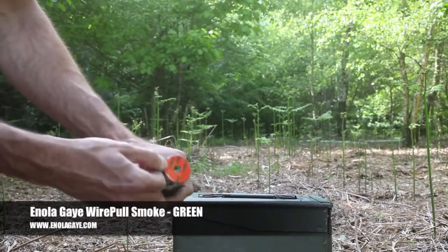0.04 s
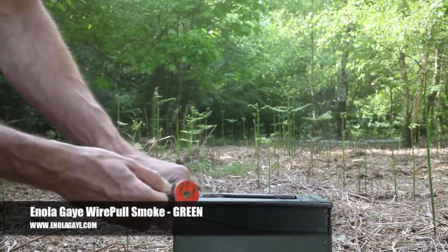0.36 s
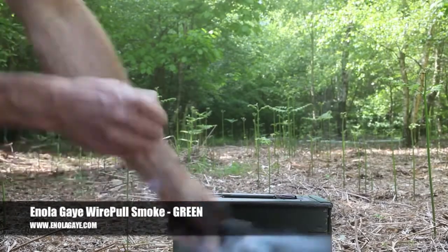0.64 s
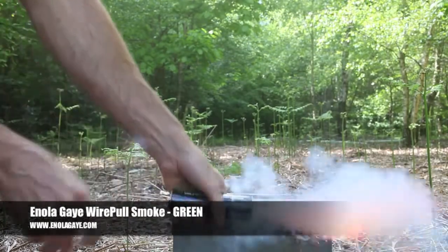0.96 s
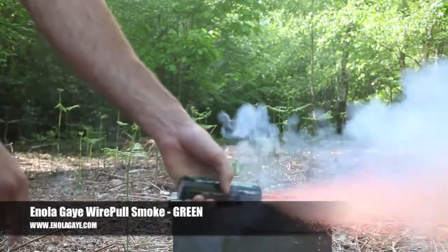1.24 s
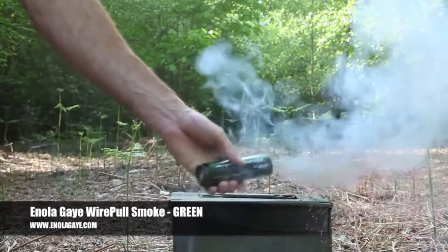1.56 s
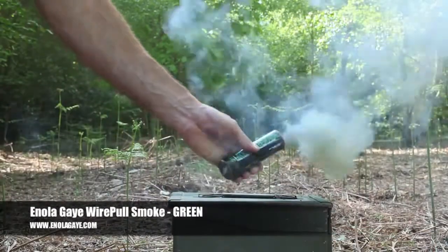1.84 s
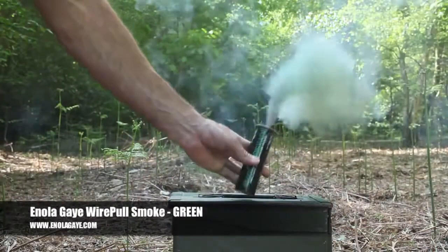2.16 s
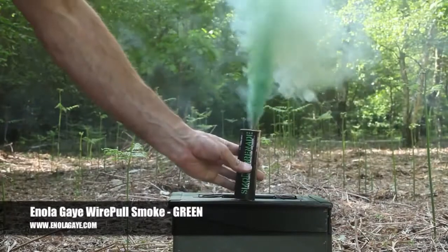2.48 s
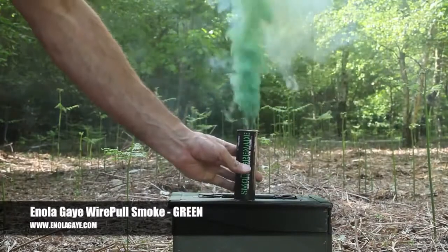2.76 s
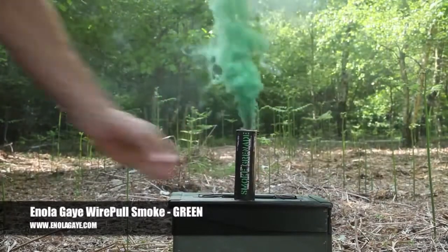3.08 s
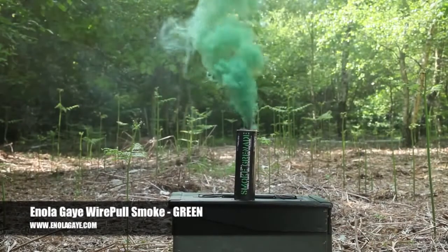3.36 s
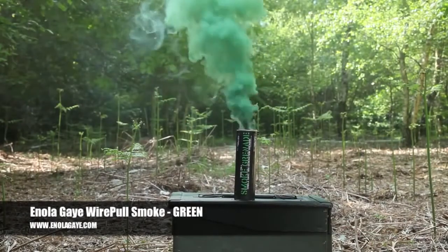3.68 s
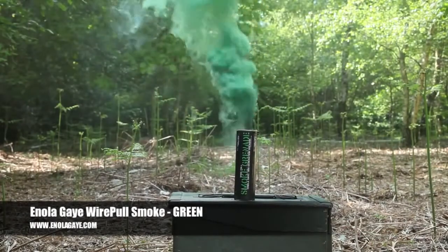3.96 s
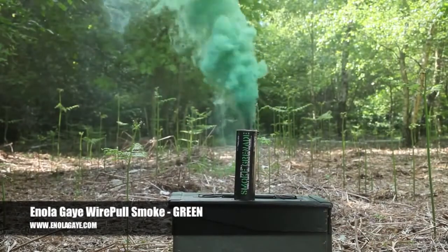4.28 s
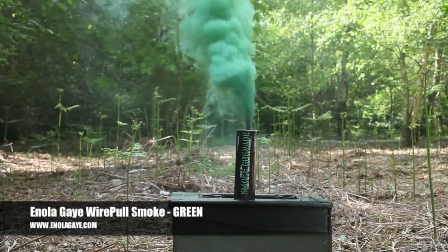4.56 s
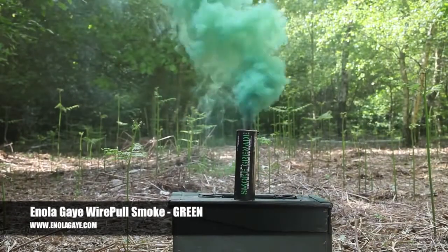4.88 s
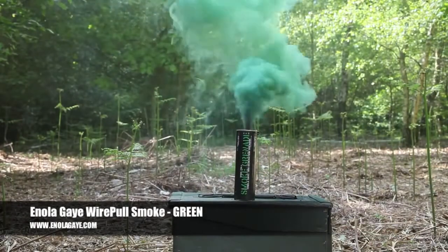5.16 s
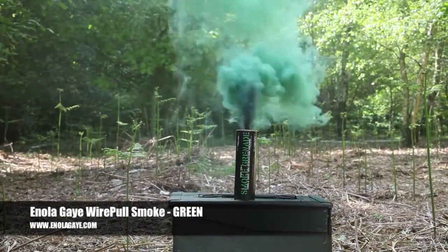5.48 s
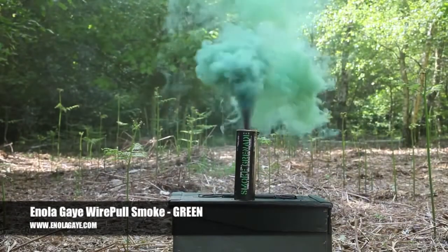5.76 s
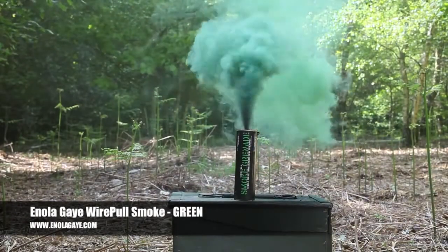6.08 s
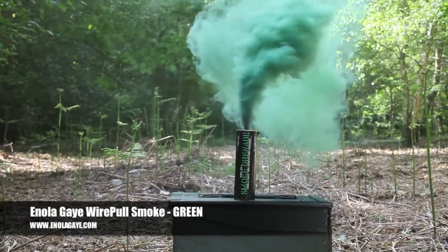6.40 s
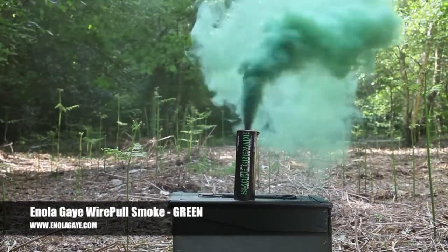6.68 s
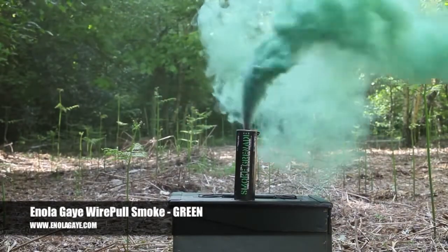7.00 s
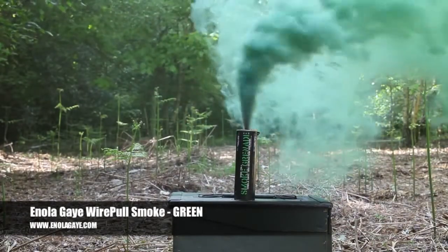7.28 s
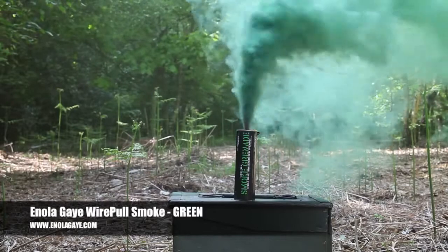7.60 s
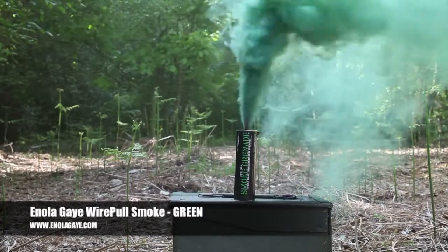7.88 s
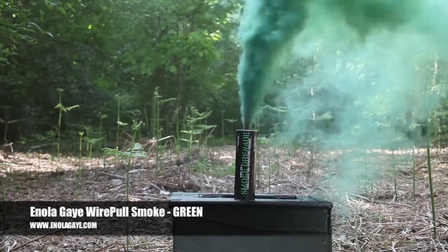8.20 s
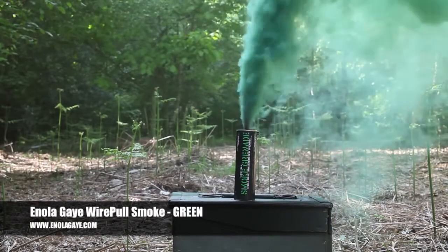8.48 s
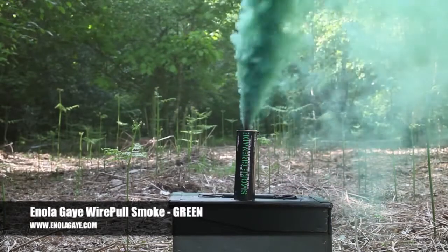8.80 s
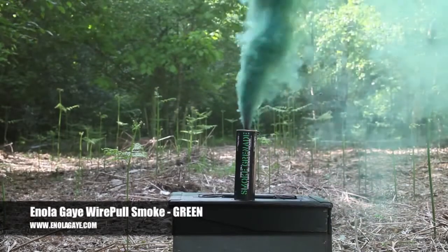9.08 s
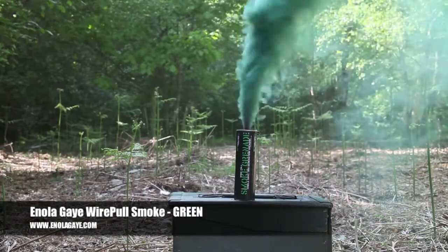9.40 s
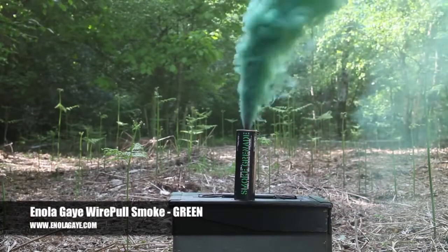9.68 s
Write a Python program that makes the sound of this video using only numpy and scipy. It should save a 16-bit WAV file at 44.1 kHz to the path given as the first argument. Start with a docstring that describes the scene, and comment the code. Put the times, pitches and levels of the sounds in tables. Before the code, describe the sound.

Close by in a wooded clearing, small handling ticks and a quick gritty pull lead to one sharp pop. A smoke canister flares with a swelling rush, then hisses with a shifting, hollow tone. The hiss dips, and sputtering crackles and snaps break through as it grows. They die away, leaving a stronger, even jet that sinks slightly in pitch. A soft wind rumble and faint leaves lie underneath.

```python
"""A smoke canister's jet roars through its resonant vent, on a metal box in a forest clearing.
First the pull ring ticks, the wire rasps through the igniter, the cap pops and a priming flame rushes out.
Then turbulent gas takes over, its main resonance sinking as the burn hollows the canister. Slag fries,
spurts and spits for a few seconds, and close echoes sweep through the jet as it is swung upright.
Underneath lie a gusty low rumble and the faint wash of the trees."""
import sys
import numpy as np
from scipy import signal
from scipy.fft import rfft, irfft, next_fast_len
from scipy.io import wavfile
from scipy.ndimage import map_coordinates

SR = 44100
rng = np.random.default_rng(int(sys.argv[2]) if len(sys.argv) > 2 else 0)


def dump_mix(stems):
    """Bounce the given channels to the path in sys.argv[1] as a 16-bit WAV at rate SR."""
    frames = np.atleast_2d(stems).T  # one column per channel
    limited = np.clip(frames, -1, 1)  # hard clip at full scale
    pcm = np.round(limited * 32767).astype(np.int16)
    wavfile.write(sys.argv[1], SR, pcm)


N = 434385
SIZE, HOP = 512, 128  # filter frame and step, in samples
TIME = np.arange(N) / SR
FRAME_S = np.arange(N // HOP + 5) * HOP / SR
HZ = np.fft.rfftfreq(SIZE, 1 / SR)

# the vent points sideways over the lid, then up and away from the close surfaces: time_s, echo_weight
VENT_AIM = [(1.4, .9), (2.05, 1.05), (2.35, 1), (2.5, .35)]
# the main charge catches: time_s, gain
CHARGE_ONSET = [(1.33, 0.051), (1.44, 1)]
# tone of a bursting speck: frequency_hz, level_db
SNAP_COLOUR = [(300, -27), (1200, -17), (2500, -3), (4000, 4.5), (6500, 0), (9000, -6), (15500, -7.5)]


def amp(db):
    """Decibels to gain."""
    return 10 ** (np.asarray(db) / 20)


def unit_rms(x):
    """Scaled to rms 1."""
    return x / np.sqrt(np.mean(x ** 2) + 1e-20)


def power_sum(*levels_db):
    """The level of unrelated sounds heard at once, in dB."""
    return 10 * np.log10(sum(amp(db) ** 2 for db in levels_db) + 1e-14)


def ramp(t, start_s, length_s):
    """A straight fade from 0 to 1."""
    return np.clip((t - start_s) / length_s, 0, 1)


def follow(rows, t):
    """The columns of an automation curve at the times t."""
    times, *columns = np.transpose(rows)
    return [np.interp(t, times, column) for column in columns]


def add(mix, start_s, sound):
    """Mixes a sound in at start_s."""
    part = mix[round(start_s * SR):][:len(sound)]
    part += sound[:len(part)]


def eq_gain(colour, hz):
    """The gain of an EQ curve whose dB points are joined on a log-frequency axis."""
    points_hz, level_db = np.transpose(colour)
    return amp(np.interp(np.log(hz + 1), np.log(points_hz + 1), level_db))


def wander(rate_hz, t):
    """Smooth random modulation, rms 1."""
    hz = np.fft.rfftfreq(len(t), t[1] - t[0])
    spectrum = rfft(rng.standard_normal(len(t))) / (1 + (hz / rate_hz) ** 2)
    return unit_rms(irfft(spectrum, len(t)))


def noise(colour):
    """Steady coloured noise, rms 1."""
    size = next_fast_len(N)
    spectrum = rfft(rng.standard_normal(size)) * eq_gain(colour, np.fft.rfftfreq(size, 1 / SR))
    return unit_rms(irfft(spectrum, size)[:N])


def click(colour):
    """The tightest click of a given colour (minimum phase), peak 1."""
    log_gain = np.log(eq_gain(colour, abs(np.fft.fftfreq(SIZE, 1 / SR))))
    pulse = np.fft.ifft(np.exp(np.conj(signal.hilbert(log_gain)))).real
    return pulse / abs(pulse).max()


def grains(per_s, spread_db):
    """Tiny impulses at random moments, a few of them large; rms 1."""
    size = amp(spread_db * np.minimum(rng.exponential(1, N), 4)) * rng.choice([-1, 1], N)
    return unit_rms(size * (rng.random(N) < per_s / SR))


def band_rms(gain, lo_hz, hi_hz):
    """Per frame, the rms that a filter passes in one band from white noise of rms 1."""
    inside = (HZ >= lo_hz) & (HZ <= hi_hz)
    return np.sqrt(np.mean(gain ** 2 * inside, axis=1, keepdims=True)) + 1e-12


def shelf(corner_hz, order):
    """A smooth step from 0 below the corner to 1 above it."""
    return 1 - 1 / (1 + (HZ / corner_hz) ** order)


def moving_filter(x, gain):
    """Passes x through an EQ that changes from frame to frame."""
    frames = signal.stft(x, nperseg=SIZE, noverlap=SIZE - HOP)[2]
    return signal.istft(frames * gain[:frames.shape[1]].T, nperseg=SIZE, noverlap=SIZE - HOP)[1][:N]


def outdoors():
    """A gusty rumble under the faint wash of the trees; both duck briefly after the pop."""
    # the rumble, whose sub-bass builds with the plume: time_s, bass_db, sub_db
    rumble_levels = [(0, -38, -55), (.5, -34, -54), (1.4, -39, -59), (2.4, -40, -58), (2.9, -32.5, -55),
                     (3.6, -36, -49), (6, -36, -43), (9.85, -37, -43)]
    # tone of the rumble: frequency_hz, level_db
    rumble_colour = [(18, -45), (25, -33), (32, -17), (45, -8.5), (62, 1), (80, -1.5), (105, -2.5),
                     (140, -3), (190, -10.5), (280, -19.5), (450, -22.5), (1000, -70)]
    # tone of the trees: frequency_hz, level_db
    trees_colour = [(150, -20), (300, 0), (460, -3.5), (800, 2), (1300, -1.5), (1900, -8), (2600, -12),
                    (3600, -2), (5000, -10.5), (8000, -13.5), (15500, -15.5)]
    bass_db, sub_db = follow(rumble_levels, TIME)
    low = noise(rumble_colour)
    sub = signal.sosfiltfilt(signal.butter(4, 55, fs=SR, output="sos"), low)
    gusts_db = 3.5 * wander(3, TIME)
    rumble = amp(bass_db) * unit_rms(low - sub) + amp(sub_db + gusts_db) * unit_rms(sub)
    trees = amp(-45.5) * noise(trees_colour)
    duck_db = -13.5 * (ramp(TIME, start_s=.59, length_s=.03) - ramp(TIME, start_s=.75, length_s=.3))
    return amp(duck_db) * (rumble + trees)


def clearing_reverb(x, t60_s):
    """A thin scatter from trunks and leaves."""
    t = TIME[:SR // 2]
    taps = rng.standard_normal(len(t)) * (rng.random(len(t)) < .05)
    taps = taps * amp(-60 * t / t60_s) * (t > .012)
    return signal.oaconvolve(x, taps / np.linalg.norm(taps))[:N]


def close_echoes(x, near, middle, far, blur_hz):
    """Three close surfaces comb the sound; the length of the plume blurs the upper notches. Rms 1."""
    # echo delays, shortening as the canister is swung upright: time_s, near_ms, middle_ms, far_ms
    delays = [(.65, 0.92, 1.06, 1.9), (.95, 0.88, 1.11, 1.87), (1.4, 0.95, 1.2, 1.78),
              (1.62, .45, 1.13, 1.5), (1.85, 0.33, 1.06, 1.36), (2.35, 0.42, 0.71, 1.3),
              (3.5, 0.38, .66, 1.4), (6, 0.38, 0.78, 1.41), (9.85, 0.35, 0.96, 1.4)]
    soft = signal.sosfiltfilt(signal.butter(1, blur_hz, fs=SR, output="sos"), x)
    for gain, delay_ms in zip((near, middle, far), follow(delays, TIME)):
        x = x + gain * map_coordinates(soft, [np.arange(N) - delay_ms * SR / 1000], order=3)
    return unit_rms(x)


def handling():
    """Fingers and pull ring scuff and tick on the canister."""
    # each touch: start_s, relative_db, t60_s
    touches = [(.104, -41, .008), (0.273, -21, 0.037), (.329, -34, 0.07), (.359, -37, .04),
               (0.4744, -15.5, 0.018)]
    # tone of a scuff: frequency_hz, level_db
    scuff_colour = [(200, -22), (800, -1), (1800, 0.5), (3500, -2), (7000, -9), (13000, -4), (16000, -12)]
    out, t = np.zeros(N), TIME[:SR // 8]
    scuff = noise(scuff_colour)
    for start_s, level_db, t60_s in touches:
        envelope = amp(level_db - 4.5 - 60 * t / t60_s)
        add(out, start_s, envelope * scuff[round(start_s * SR):][:len(t)])
    return out


def pull_wire():
    """The wire drags through the friction compound with a gritty rasp."""
    # the pull: time_s, relative_db
    pull = [(.5, -65), (.545, -36), (.559, -36), (.565, -24), (.583, -28), (.592, -17), (.604, -19.5),
            (.609, -33), (.625, -60)]
    # tone of the rasp: frequency_hz, level_db
    rasp_colour = [(300, -19), (1000, -10), (2800, -1.5), (4200, -6), (5500, -11), (10000, -11),
                   (15500, -9)]
    level_db, = follow(pull, TIME)
    friction = noise(rasp_colour)
    grit = unit_rms(signal.oaconvolve(grains(1200, spread_db=3), click(rasp_colour))[:N])
    pulling = (TIME > pull[0][0]) & (TIME < pull[-1][0])
    return amp(level_db - 4.5) * (friction + .7 * grit) * pulling


def cap_pop():
    """The igniter cap cracks three times in one pop, puffing gas and ringing the tube."""
    # each crack: start_s, gain_db
    cracks = [(.5843, 0.5), (0.5856, 1), (0.5866, 3)]
    # modes of the tube: pitch_hz, level_db, t60_s
    tube_modes = [(756, -24, 0.011), (1130, -11.5, 0.012), (1730, -5, 0.0076), (2620, -2, 0.0074),
                  (3130, -6, 0.01), (3400, -7, 0.014), (6500, -16, 0.0076)]
    out, t = np.zeros(N), TIME[:SR // 20]
    ring = sum(amp(db - 60 * t / t60_s) * np.sin(2 * np.pi * hz * t) for hz, db, t60_s in tube_modes)
    for start_s, gain_db in cracks:
        gas = amp(-20 - 60 * t / .013) * rng.standard_normal(len(t))
        add(out, start_s, amp(gain_db) * (ring + gas))
    return out


def priming_flame():
    """The priming charge flares sideways just over the lid: a broad, hollow rush."""
    # the flame swells and dies: time_s, level_db
    swell = [(.61, -39), (.68, -32), (.77, -31.5), (.92, -24), (1.0, -24.5), (1.05, -22), (1.19, -18),
             (1.26, -21), (1.4, -27.5)]
    # tone of the flame: frequency_hz, level_db
    flame_colour = [(100, -30), (230, 2), (330, 5), (480, -13), (620, -3), (800, -2.5), (1200, -1.5),
                    (1420, -1), (1650, 2.5), (1920, -3.5), (2500, 3), (3300, 4), (4100, -7.5), (6000, -13),
                    (10000, -14.5), (15500, -26)]
    t = FRAME_S[:, None]
    level_db, = follow(swell, t)
    bass_db = -12.5
    treble_db = -17 - 25 * ramp(t, start_s=1.25, length_s=.5)  # the dying flame dulls
    gain = eq_gain(flame_colour, HZ)[None]
    gain = gain / band_rms(gain, 700, 4000)  # treble and bass are set against the mids
    gain = gain * (amp(treble_db) / band_rms(gain, 6000, 15000)) ** shelf(4500, order=6)
    gain = gain * (amp(bass_db) / band_rms(gain, 150, 400)) ** (1 - shelf(400, order=6))
    burning = np.interp(TIME, [.6, .615, 1.35, 1.45], [0, 1, 1, 0])
    rush = rng.standard_normal(N) + .5 * grains(2500, spread_db=2.5)
    rush = close_echoes(rush, near=.36, middle=.46, far=.26, blur_hz=8000)
    flicker_db = wander(50, TIME)
    return moving_filter(rush, gain * amp(level_db)) * burning * amp(flicker_db)


def specks():
    """Small specks burst at random: faint ticks between the loud spits."""
    # how thickly the burn sputters: time_s, specks_per_s
    density = [(3, 0), (3.2, 8), (3.8, 10), (4.1, 55), (6.2, 55), (6.5, 15), (6.9, 0)]
    per_s, = follow(density, TIME)
    size = amp(-25 + 4 * np.minimum(rng.exponential(1, N), 3))
    bursts = size * (rng.random(N) < per_s / SR)
    return signal.oaconvolve(bursts, click(SNAP_COLOUR))[:N]


def spits():
    """The loudest specks burst with a sharp snap and a brief spray, some dull, some bright."""
    # each spit: start_s, relative_db, tilt_db_per_octave
    hits = [(1.0388, -12, -10), (1.3373, -19, -1), (1.3499, -19, 2), (3.849, -18, -6.5), (4.009, -12, -2),
            (4.0561, -17, -6), (4.1025, -17, 1.2), (4.1386, -18, 0), (4.246, -19, 0), (4.368, -26, -3),
            (4.5502, -17.5, -2), (4.5702, -13.5, -9.5), (4.621, -22, -7), (4.8043, -18, -2),
            (4.8497, -13.5, -8), (4.924, -15, -4), (4.985, -18, -3.3), (5.1564, -19, -4), (5.3648, -20, -2),
            (5.4215, -12.5, -10), (5.4371, -15.5, -4), (5.6475, -17, -7), (6.1015, -19, -1),
            (6.1055, -15, 4), (6.1925, -16, -4), (6.2013, -19, -3), (6.2346, -21, -6)]
    tilt_above_hz = 900
    out, t = np.zeros(N), TIME[:SIZE]
    for start_s, level_db, tilt in hits:
        colour = [(hz, db + tilt * np.log2(max(hz / tilt_above_hz, 1))) for hz, db in SNAP_COLOUR]
        burst = .21 * rng.standard_normal(SIZE) * amp(-60 * t / .008)
        burst[0] = 1  # the snap, ahead of its spray
        add(out, start_s, amp(level_db + 7.5) * np.convolve(burst, click(colour)))
    return out


def slag_spurts(t):
    """Burning slag spurts in lopsided swells; gives their summed level and top-treble level in dB."""
    # each spurt: peak_s, rise_s, fall_s, level_db, top_offset_db
    spurts = [(.68, 0.03, 0.041, -31.5, 6), (.82, 0.097, 0.22, -43, 7), (1.037, .01, 0.02, -31.5, 1),
              (1.15, .07, .07, -29.5, -2.5), (1.342, 0.0075, .015, -36, 0), (3.48, .09, .1, -43, -11),
              (3.89, 0.034, 0.082, -31.5, -6), (3.995, 0.019, 0.052, -28.5, -4),
              (4.12, 0.093, 0.075, -36.5, -2), (4.28, 0.092, 0.22, -47, -7), (4.56, 0.051, .06, -35, -10),
              (4.86, 0.16, 0.085, -28.5, -9), (4.97, 0.068, 0.035, -22.5, -10),
              (5.09, 0.12, .11, -34.5, -2), (5.42, 0.1, 0.077, -39.5, -2.5), (5.525, 0.024, 0.048, -29, 0),
              (5.6, .03, 0.097, -40.5, 0), (5.8, 0.093, 0.13, -39, -3.5), (6.09, 0.14, 0.16, -36, -5),
              (6.66, .015, 0.023, -44, -1)]
    total = top = 1e-14
    for peak_s, rise_s, fall_s, level_db, top_offset_db in spurts:
        width_s = np.where(t < peak_s, rise_s, fall_s)
        power = amp(level_db) ** 2 * np.exp(-2 * ((t - peak_s) / width_s) ** 2)
        total = total + power
        top = top + power * amp(top_offset_db) ** 2
    return 10 * np.log10(total), 10 * np.log10(top)


def vent_resonance(sweep, width_hz, wobble):
    """The gain of a resonant peak whose pitch wavers with the flow."""
    pitch_hz, boost_db = follow(sweep, FRAME_S[:, None])
    pitch_hz = pitch_hz * (1 + wobble * wander(26, FRAME_S)[:, None])
    return np.sqrt(1 + (amp(boost_db) ** 2 - 1) / (1 + (2 * (HZ - pitch_hz) / width_hz) ** 2))


def sizzle():
    """Slag fries in the vent: a smooth hiss when weak, grainy and uneven when it spurts."""
    # steady frying: time_s, relative_db
    frying = [(1.4, -44), (1.8, -49.5), (2.05, -46.5), (2.36, -43.5), (2.46, -55), (3.2, -50.5), (7.2, -51),
              (8.3, -48), (9.85, -42)]
    # tone of the frying: frequency_hz, level_db
    frying_colour = [(200, 0.5), (500, -2.5), (1200, 4), (2500, 3.5), (4000, 8), (5200, 4.5), (6500, 1.5),
                     (8000, 1), (10500, 2), (13000, 1), (15800, -6)]
    # shrill resonance of the vent's rim, which sinks and swells over the burn: time_s, pitch_hz, boost_db
    rim_sweep = [(1.4, 7400, 2), (2.2, 7800, 9), (2.8, 7500, 15), (3.5, 6900, 11), (4.9, 6500, 3.5),
                 (5.4, 5700, 9), (7, 5800, 0), (9.85, 6000, 3)]
    t = FRAME_S[:, None]
    steady_db = follow(frying, t)[0] + 20 * np.log10(follow(CHARGE_ONSET, t)[0])
    spurt_db, spurt_top_db = slag_spurts(t)
    level_db = power_sum(steady_db, spurt_db)
    top_offset_db = power_sum(steady_db - 7, spurt_top_db) - level_db
    gain = eq_gain(frying_colour, HZ) * vent_resonance(rim_sweep, width_hz=1700, wobble=.01)
    gain = gain / band_rms(gain, 5000, 8500)
    gain = gain * (amp(top_offset_db) / band_rms(gain, 9000, 15000)) ** shelf(8500, order=8)
    grit_share = np.interp(np.interp(TIME, FRAME_S, spurt_db[:, 0]), [-52, -40], [.09, .33])
    grit_share *= np.interp(TIME, [1.4, 3.4], [.35, 1])  # smooth at first, until slag builds up
    hiss = np.sqrt(1 - grit_share) * rng.standard_normal(N)
    grit = np.sqrt(grit_share) * grains(1500, spread_db=3.6)
    send = follow(VENT_AIM, TIME)[0] ** 2
    fry = close_echoes(hiss + grit, near=.2 * send, middle=.27 * send, far=.5 * send, blur_hz=14000)
    flicker_db = 5 * grit_share * wander(50, TIME)
    return moving_filter(fry, gain * amp(level_db - 2.5)) * amp(flicker_db)


def smoke_jet():
    """Turbulent gas roars through three vent resonances, fluttering and surging with each spurt."""
    # loudest when swung over the lid, drops when stood up, builds with the burn: time_s, relative_db
    roar = [(1.35, -28), (1.53, -25.5), (1.87, -26.5), (1.97, -22.7), (2.17, -21), (2.31, -18.5),
            (2.38, -20.5), (2.44, -29), (2.64, -32), (3.4, -28), (4.6, -24.5), (6.9, -23), (7.6, -21.5),
            (9.85, -20)]
    # tone of the roar: frequency_hz, level_db
    roar_colour = [(120, -11.5), (220, -1), (400, -6.5), (720, -2), (1080, -4), (1430, -4), (2000, 0.5),
                   (2450, 2.5), (2750, -0.5), (3200, 2), (3650, 0), (4400, -13), (5200, -24), (12000, -58)]
    # main resonance, sinking as the burn hollows the canister: time_s, pitch_hz, boost_db
    main_sweep = [(1.35, 2550, 3), (1.75, 2550, 8.5), (2.2, 2360, 3), (2.7, 2220, 3), (3.5, 2300, 9.5),
                  (5, 2200, 7.5), (6.8, 2140, 7), (7.6, 1980, 12), (9.2, 1950, 10), (9.85, 2020, 5.5)]
    # it narrows as it sinks: time_s, width_hz
    main_width = [(2.2, 600), (3.5, 420), (6.8, 330), (7.6, 195), (9.85, 240)]
    # upper resonance: time_s, pitch_hz, boost_db
    upper_sweep = [(1.35, 3040, 4), (2.3, 3020, -0.5), (3.3, 3470, 2.5), (5, 3660, 4), (7, 3640, 4.5),
                   (9.85, 3500, 4)]
    # lower resonance, growing late as the canister empties: time_s, pitch_hz, boost_db
    lower_sweep = [(1.35, 1450, 8.5), (2.2, 1390, 4.5), (3.5, 1340, 2.5), (7, 1440, 3), (9.85, 1486, 11.5)]
    t = FRAME_S[:, None]
    surge_db = slag_spurts(t)[0] - 3.5
    level_db = power_sum(follow(roar, t)[0], surge_db) - 1 + .51 * wander(9, FRAME_S)[:, None]
    hollow = ramp(t, start_s=7.13, length_s=.37)  # the burn breaks through and the low body fills out
    body_db = -13.5 + 2 * hollow + .65 * wander(15, FRAME_S)[:, None]
    gain = eq_gain(roar_colour, HZ)
    gain = gain * vent_resonance(main_sweep, width_hz=follow(main_width, t)[0], wobble=.016)
    gain = gain * vent_resonance(upper_sweep, width_hz=980, wobble=.015)
    gain = gain * vent_resonance(lower_sweep, width_hz=127, wobble=.01)
    gain = gain / band_rms(gain, 1500, 4000)
    gain = gain * (amp(body_db) / band_rms(gain, 500, 1200)) ** (1 - shelf(1600, order=8))
    treble_db = 10 * (follow(VENT_AIM, t)[0] - VENT_AIM[-1][1])  # brighter while the vent lies sideways
    gain = gain * amp(treble_db * shelf(4500, order=12))
    send, = follow(VENT_AIM, TIME)
    gas = rng.standard_normal(N)
    gas = close_echoes(gas, near=.16 * send, middle=.18 * send, far=.33 + .12 * send, blur_hz=3600)
    flutter_db = .64 * wander(45, TIME)
    onset, = follow(CHARGE_ONSET, TIME)
    return moving_filter(gas, gain * amp(level_db)) * amp(flutter_db) * onset


def scene():
    """Canister and forest sit in the centre; only a trace of bright hiss differs between the ears."""
    ignition = handling() + pull_wire() + cap_pop() + priming_flame()
    canister = ignition + smoke_jet() + sizzle() + spits() + specks()
    mid = canister + amp(-29) * clearing_reverb(canister, t60_s=.3) + outdoors()
    side = amp(-60.5) * noise([(1000, -11), (4000, -25), (8000, -1), (15000, 5.5)])
    return np.array([mid + side, mid - side])


def record(dry):
    """The pop overloads into hard clipping; a steep low-pass then trims the very top."""
    lowpass = signal.firwin(511, 15900, window=("kaiser", 9), fs=SR)
    return signal.oaconvolve(np.clip(dry, -1, 1), lowpass[None], "same")


dry = scene()
out = record(dry)
dump_mix(out)
```